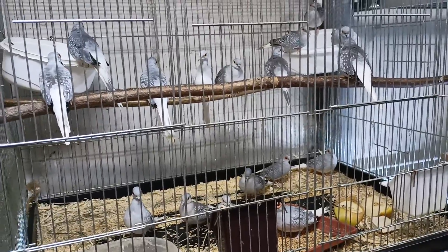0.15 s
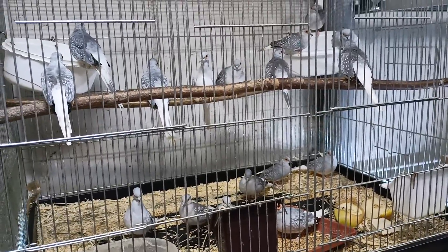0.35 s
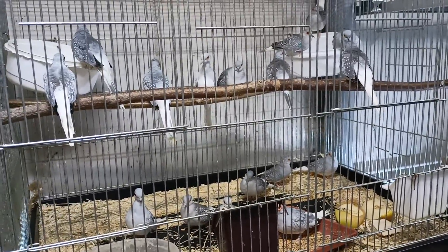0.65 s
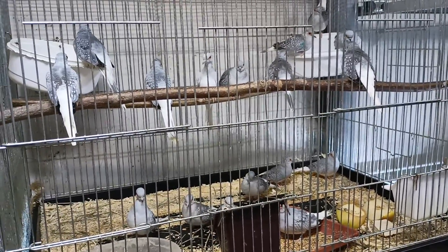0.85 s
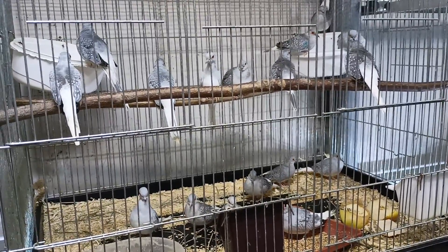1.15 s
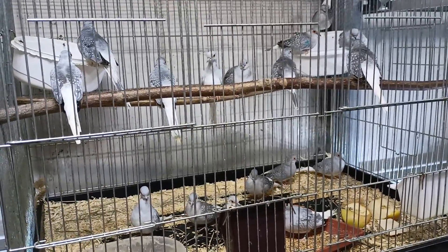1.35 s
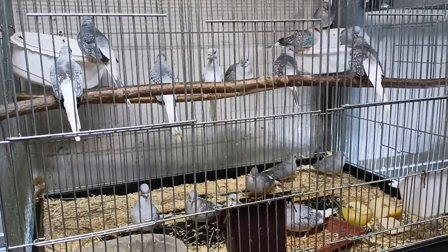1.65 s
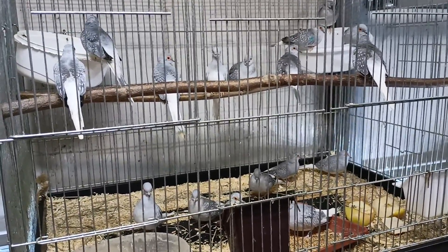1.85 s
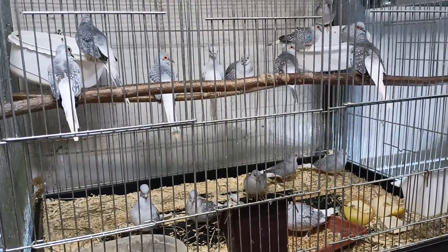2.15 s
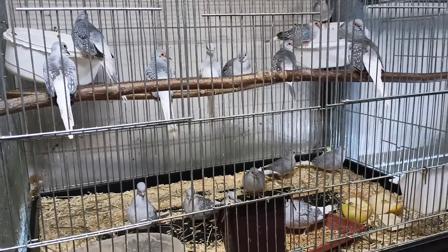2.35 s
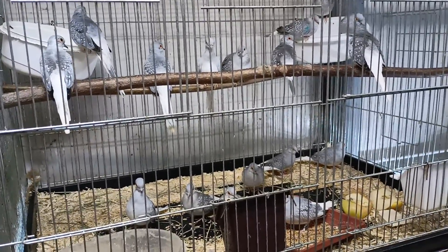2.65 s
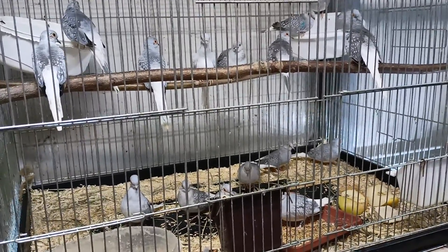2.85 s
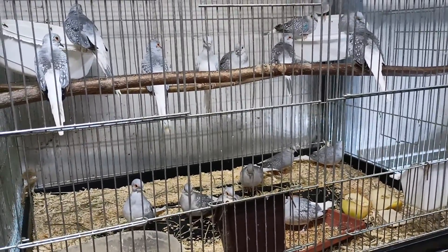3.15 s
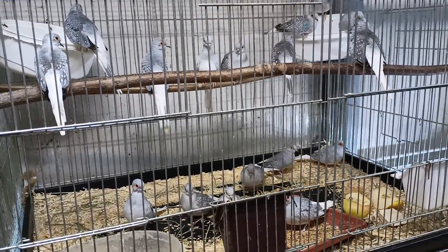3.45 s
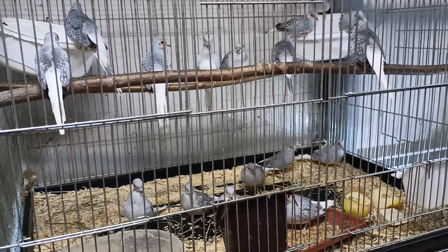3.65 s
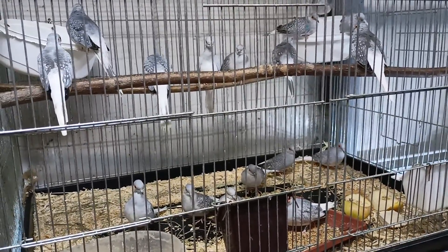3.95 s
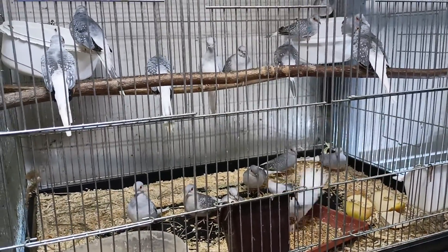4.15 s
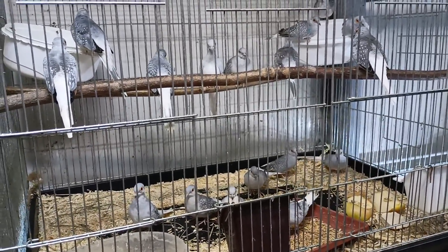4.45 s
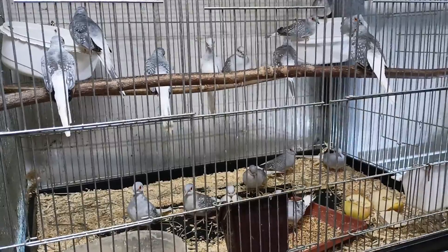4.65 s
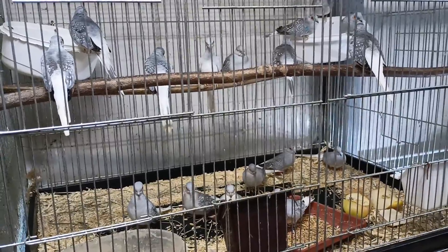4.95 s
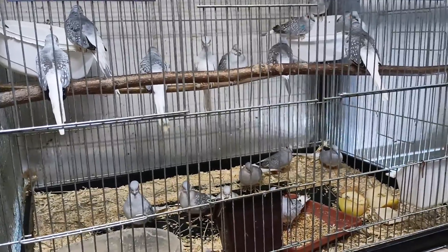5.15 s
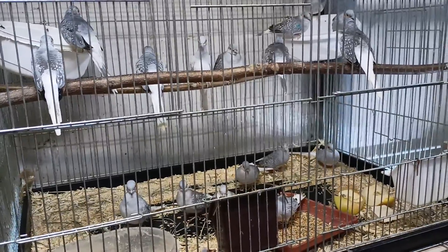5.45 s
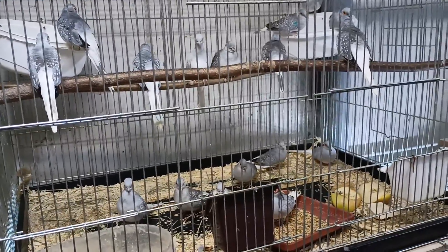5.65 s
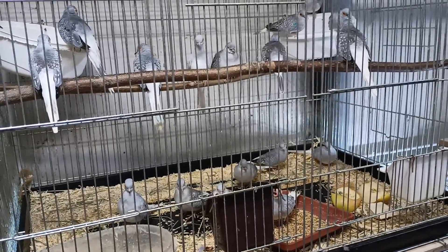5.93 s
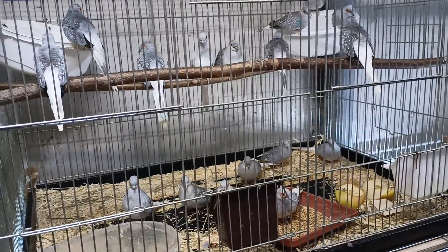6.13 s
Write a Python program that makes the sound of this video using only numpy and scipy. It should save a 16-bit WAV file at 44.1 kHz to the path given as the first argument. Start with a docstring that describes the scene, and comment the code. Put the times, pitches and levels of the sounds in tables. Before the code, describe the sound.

A reverberant hard-walled room holds small caged doves and finches over low room noise and a faint wavering hum. At 0 s comes a soft, bright swish of feathers with a thin falling squeak. From 0.4 to 0.95 s short nasal yaps repeat about every eighth of a second, trailing into fainter ones until 1.4 s, with a soft peep and a falling chip around 1.0-1.2. A distant rising whistle at 1.55 is followed by a loud, near one at 1.75. Feathers rustle and wing strokes snap crisply from 2.1 to 2.45, then tiny peeps patter to 3.2. A strong, airy, thumping wing flurry swells at 3.2-3.4 and again from 3.7. At 4.0 a loud scratchy cry rings out, dropping to a lower held note until 4.3. Sharp wing snaps hit near 4.45, then quiet. A final rising whistle sounds at 5.4, echoing into faint air and tiny chips until 6.3.

```python
"""A hard-walled room of small doves and finches in wire cages, with low room noise and a wavering hum.
First a swish of plumage, low air noise and a thin falling call, then nasal yaps of pulses through a throat
filter, soft peeps and sweeping chips, and two rising whistles of summed partials, the first from far off.
Noise shaped by wingbeats swells and fades with feather snaps, strongest after 3 s; a loud ringing cry
follows at 4 s, and a last whistle at 5.4 s. Echoes and a room tail surround calls and plumage."""
import sys
import numpy as np
from scipy import signal
from scipy.fft import rfft, irfft, next_fast_len
from scipy.io import wavfile
from scipy.ndimage import map_coordinates

SR = 44100
rng = np.random.default_rng(int(sys.argv[2]) if len(sys.argv) > 2 else 0)


def unload_wav(signal):
    """Save mono or channel-first audio to the path in sys.argv[1] as 16-bit WAV at rate SR, clipped to [-1, 1]."""
    wavfile.write(
        sys.argv[1],
        SR,
        np.round(np.clip(np.atleast_2d(signal).T, -1, 1) * 32767).astype(np.int16),
    )


N = 277277
TIME = np.arange(N) / SR
EDGE_HZ = 15950  # upper band limit


def amp(db):
    """Decibels to gain."""
    return 10 ** (np.asarray(db) / 20)


def unit(x):
    """Scales to rms 1."""
    return x / np.sqrt(np.mean(x ** 2) + 1e-20)


def read(points, hz):
    """Reads a spectrum on a log-frequency axis."""
    f, value = np.transpose(points)
    return np.interp(np.log(hz + 1), np.log(f), value)


def curves(rows):
    """Sample times and every column of a curve table."""
    s, *columns = np.transpose(rows)
    t = np.arange(s[0], s[-1], 1 / SR)
    return [t] + [np.interp(t, s, c) for c in columns]


def add(mix, s, sound):
    """Mixes a sound in at time s."""
    part = mix[max(round(s * SR), 0):][:len(sound)]
    part += sound[:len(part)]


def colour(x, spectrum):
    """Filters by a spectrum; rms 1."""
    size = next_fast_len(len(x) + 2048)
    gain = amp(read(spectrum, np.fft.rfftfreq(size, 1 / SR)))
    return unit(irfft(rfft(x, size) * gain, size)[:len(x)])


def wander(size, per_s):
    """Random motion in straight ramps between per_s random values a second."""
    knots = rng.standard_normal(2048)
    return map_coordinates(knots, [np.arange(size) * per_s / SR], order=1, mode="wrap")


def faded(x):
    """Softens both ends over up to 3 ms."""
    return x * signal.windows.tukey(len(x), min(1, 256 / len(x)))


def burst(rise_s, hold_s, fade_db_per_s, db, curve=1.14):
    """An envelope that swells, holds, then dies away."""
    t = TIME[:2 * SR]
    fade_db = fade_db_per_s * np.maximum(t - rise_s - hold_s, 0)
    return np.minimum(t / rise_s, 1) ** curve * amp(db - fade_db)


def bursts(rows):
    """The joint envelope of a table of bursts; their powers add."""
    power = np.zeros(N)
    for s, *shape in rows:
        add(power, s, burst(*shape) ** 2)
    return np.sqrt(power)


def syrinx(hz, rough, throat, jitter=.09, jitter_per_s=600, breath=1.0):
    """Pulses that grow uneven and noisy with roughness, through the throat."""
    rough = np.clip(rough, 0, .45)
    turns = np.cumsum(hz * (1 + jitter * rough * wander(len(hz), jitter_per_s))) / SR
    # the windpipe delays high harmonics more, which spreads each pulse over its cycle
    pulses = sum(np.cos(2 * np.pi * k * turns - np.pi * k * k / 14) * (k * hz < EDGE_HZ)
                 for k in range(1, 30))
    # turbulence is weak in the bass, so the lowest harmonics stay clear
    hiss = rng.standard_normal(len(hz)) * (1 + np.cos(2 * np.pi * turns))
    puffs = colour(hiss, [(700, -12), (2500, 0)])
    return colour((1 - rough) * unit(pulses) + breath * rough * puffs, throat)


def call(rows, throat):
    """A call that follows its pitch, level and roughness curves."""
    t, hz, db, rough = curves(rows)
    return t[0], faded(amp(db) * syrinx(hz, rough, throat))


# level of the room noise at the microphone: (time [s], level [dB])
BACKGROUND_LEVEL = [(0, -57.5), (2.9, -61), (5.55, -61), (5.9, -67), (6.29, -67.5)]
# its colour: (frequency [Hz], level [dB])
BACKGROUND_COLOUR = [(30, -28), (60, -9), (105, -4.5), (160, -8), (370, -13), (520, -16.5), (880, -19),
                     (1200, -25.5), (1800, -26), (3400, -37.5), (7700, -35.5), (10000, -42), (16000, -36)]
# ventilation tones: (frequency [Hz], level against the noise [dB])
VENTILATION_HUM = [(102, -5), (204, -3)]


def background():
    """Low room noise with a ventilation hum that wavers in phase and strength."""
    hum = np.zeros(N)
    for hz, db in VENTILATION_HUM:
        tone = np.sin(2 * np.pi * hz * TIME + wander(N, 22))
        hum += amp(db) * unit(tone * (1 + .4 * wander(N, 11)))
    level = amp(np.interp(TIME, *np.transpose(BACKGROUND_LEVEL)))
    return (colour(rng.standard_normal(N), BACKGROUND_COLOUR) + hum) * level


# sharp wing strokes: (time [s], level [dB], decay to 1/e [s])
WING_SNAPS = [(.912, -43.5, 0.0092), (2.135, -28.5, 0.0094), (2.18, -32.5, 0.0075), (2.267, -31, 0.0079),
              (2.31, -44, 0.016), (2.344, -34.5, 0.0105), (2.427, -33, 0.0082), (3.157, -48.5, 0.013),
              (4.436, -30.5, 0.0055), (4.481, -23.5, 0.0075), (4.94, -55, 0.019)]
# bright swishes of ruffled plumage: (time [s], level [dB])
SWISHES = [(0, -39), (3.234, -32)]
# colour of a swish: (frequency [Hz], level [dB])
SWISH_COLOUR = [(1000, -15), (2300, -13.5), (4000, -20), (5500, -15.5), (6700, -8), (8000, -3.5),
                (9500, -17), (12000, -15.5), (14000, -27), (16000, -16)]
# colour of feathers in snaps and rustles: (frequency [Hz], level [dB])
FEATHER_COLOUR = [(350, -16), (600, -4.5), (970, -9.5), (1830, -8.5), (2010, -8.5), (2210, -11),
                  (3340, -15.5), (5050, -12.5), (6460, -13), (7410, -7.5), (10700, -18.5), (15100, -13),
                  (16000, -10)]


def plumage():
    """Noise through the feathers: sharp wing-tip strokes and longer swishes of ruffled plumage."""
    out, t = np.zeros(N), TIME[:4096]
    for s, db, decay_s in WING_SNAPS:
        snap = colour(rng.standard_normal(len(t)), FEATHER_COLOUR)
        add(out, s, amp(db) * snap * np.exp(-t / decay_s))
    for s, db in SWISHES:
        swell = burst(rise_s=0.0215, hold_s=0.016, fade_db_per_s=138.5, db=db)
        add(out, s, swell * colour(rng.standard_normal(len(swell)), SWISH_COLOUR))
    return out


# swells of low air noise, the strongest from flapping wings:
# (time [s], rise [s], hold [s], fade [dB/s], level [dB])
AIR_SWELLS = [(0, 0.013, .15, 78, -49.5), (.42, .13, .3, 26.5, -58), (1.13, 0.049, .12, 94, -55),
              (1.85, 0.065, .02, 67, -41.5), (1.95, .2, .27, 110, -39), (3.23, 0.14, .06, 34, -29),
              (3.77, 0.17, .06, 23.5, -37), (4.35, 0.057, .02, 59, -35), (4.62, 0.097, .13, 158, -48),
              (5.0, 0.15, 0.22, 32, -70.5), (5.62, 0.057, .04, 125.5, -56)]
# colour of the air noise: (frequency [Hz], level [dB])
AIR_COLOUR = [(21, -50), (35, -21.5), (85, 1), (141, -6.5), (191, 0.5), (309, -7), (351, -1), (458, -11.5),
              (588, -10), (970, -21.5), (2250, -30), (2500, -26), (3250, -50.5), (5500, -120)]
# feathers rubbing as the wings work: (time [s], rise [s], hold [s], fade [dB/s], level [dB])
FEATHER_RUSTLES = [(1.52, .35, 0.535, 174, -43), (3.0, 0.036, 0.062, 120, -61.5),
                   (3.153, 0.021, 0.064, 115, -49), (3.22, 0.12, 0.068, 63.5, -37),
                   (3.72, 0.36, .04, 38.5, -39), (4.38, 0.066, 0.053, 64, -41.5),
                   (4.7, .1, 0.07, 110, -62.5)]
WINGBEATS_PER_S = 23  # average rate


def wings(air_throb=0.12, feather_throb=0.14, grain_db=2, thump_db=-3.0, thump_growth=0.254):
    """Air noise and feather rustle throb at the wingbeat rate; strong swells add a deep thump."""
    beat = np.cos(2 * np.pi * np.cumsum(WINGBEATS_PER_S * (1 + .12 * wander(N, 8.9))) / SR)
    air = colour(rng.standard_normal(N), AIR_COLOUR) * unit(1 + air_throb * beat)
    deep = signal.sosfiltfilt(signal.butter(2, 115, fs=SR, output="sos"), air)
    grains = rng.standard_normal(N) * amp(grain_db * wander(N, 900))
    rustle = colour(grains, FEATHER_COLOUR) * unit(1 + feather_throb * beat)
    swell = bursts(AIR_SWELLS)
    # above a swell of -42 dB the bass grows faster than the rest of the air
    thump = amp(thump_db) * np.maximum(swell / amp(-42), 1) ** thump_growth * deep
    return swell * (air - deep + thump) + bursts(FEATHER_RUSTLES) * rustle


# a thin falling call: (time [s], pitch [Hz], level [dB], roughness [0-1])
SQUEAK = [(0, 1340, -35.5, 0.15), (.04, 1275, -44.5, 0.05), (.11, 1180, -42, 0.07)]
# its throat: (frequency [Hz], level [dB])
SQUEAK_THROAT = [(700, -4), (1250, -3.5), (2500, -4.5), (4000, -15), (12000, -14)]


def squeak():
    """Nearly clean pulses sinking in pitch through a broad throat, fullest below 2.5 kHz."""
    return call(SQUEAK, SQUEAK_THROAT)


# nasal yaps: (time [s], length [s], top pitch [Hz], end pitch [Hz], level before the swell [dB],
# roughness [0-1], beak ring [dB], treble [dB], gape [factor on the upper throat])
YAPS = [(.422, 0.053, 858.6, 668, -37.5, 0.46, 8.5, 1.5, 1.12),
        (0.546, 0.047, 833, 582, -24.5, 0.52, 18, 1.5, 1.02),
        (0.671, 0.038, 818, 594, -26.5, 0.36, 12, 5, 1.07),
        (0.805, 0.04, 790, 581.4, -23.5, 0.18, 19.5, 1.5, 0.96),
        (0.91, 0.042, 724.7, 703, -41.5, 0.7, 14, -20, 1.1),
        (1.1, 0.074, 688, 600, -44, 0.3, -5.5, 3.5, 1.2),
        (1.232, 0.031, 559.6, 520, -42.5, 0.42, -17.5, 1, 1.12),
        (1.36, 0.067, 690, 557, -49.5, 0.29, -3, 4, 1.14)]
# throat of a yap: (frequency [Hz], level [dB])
YAP_THROAT = [(400, -3.5), (750, 0.5), (1100, -1), (1600, -1), (2400, -2), (3500, -8.5), (4300, -9),
              (5300, -14.5), (7000, -9.5), (8100, -19), (9300, -19), (10400, -40), (12300, -32),
              (14200, -17.5), (15600, -26)]


def yap(s, length, top_hz, end_hz, db, rough, ring_db, treble_db, gape,
        start_share=.72, rise_s=0.019, beak_hz=3120, beak_width_hz=450):
    """A short pitch arch; the open beak rings at one frequency, a wider gape lifts upper resonances."""
    t = np.arange(0, length, 1 / SR)
    crest = min(rise_s, .7 * length)
    pitch = np.interp(t, [0, crest / 2, crest, length],
                      [start_share * top_hz, 0.87 * top_hz, top_hz, end_hz])
    f = np.geomspace(300, 16000, 160)
    upper = np.tanh((f - 4400) / 900)  # -1 in the bass, 1 in the treble
    shape = read(YAP_THROAT, f / gape ** ((1 + upper) / 2)) + treble_db * upper
    shape += ring_db * np.exp(-.5 * ((f - beak_hz) / beak_width_hz) ** 2)
    swell_db = np.interp(t, [0, crest, .75 * length, length], [-13, 5.5, -4.5, 5.5])
    return s, faded(amp(db + swell_db) * syrinx(pitch, rough, np.column_stack([f, shape])))


# soft contact peeps: (time [s], length [s], middle pitch [Hz], glide [end/start pitch], level [dB])
PEEPS = [(1.039, 0.02, 1332, 1.45, -38), (2.269, 0.017, 1106, 1.08, -41), (2.5, 0.017, 1238, 1.3, -37),
         (2.739, .022, 1065, 1.08, -56), (2.767, 0.022, 855, 0.86, -48), (2.859, .022, 1113, 1.17, -48),
         (2.921, 0.0243, 886, 1.5, -45.5), (2.97, 0.023, 1020, 1.08, -53),
         (3.045, 0.027, 1077, 0.86, -52.5), (3.165, 0.03, 933, 1.32, -42)]
# throat of a peep: (multiple of the pitch, level [dB])
PEEP_OVERTONES = [(1, -12.5), (2, 7), (3, -11), (4, -12.5), (8, -25.5)]


def peep(s, length, hz, glide, db, rough=0.25, fade_db=5):
    """A tiny gliding note whose second harmonic carries the sound."""
    rows = [(s, hz / glide ** .5, db, rough),
            (s + length / 2, hz, db, rough),
            (s + length, hz * glide ** .5, db - fade_db, rough)]
    return call(rows, [(k * hz, level) for k, level in PEEP_OVERTONES])


# quick chips: (time [s], length [s], start pitch [Hz], end pitch [Hz], level [dB], overtone [dB])
CHIPS = [(1.202, 0.023, 4170, 1890, -35.5, -7.5), (2.76, 0.0094, 2210, 4100, -51.5, -8),
         (2.91, 0.016, 1970, 3770, -52.5, -10), (3.153, .012, 1470, 3600, -47, -11),
         (5.86, .014, 2515, 4110, -60.5, -20.5), (6.013, 0.029, 4240, 2232, -53.5, -7),
         (6.137, .012, 8600, 6500, -65.5, -33.5)]


def chip(s, length, start_hz, end_hz, db, overtone_db):
    """A quick sweep with one overtone, an octave up."""
    hz = np.geomspace(start_hz, end_hz, int(length * SR))
    phase = 2 * np.pi * np.cumsum(hz) / SR
    return s, faded(amp(db) * unit(np.sin(phase) + amp(overtone_db) * np.sin(2 * phase)))


# rising whistles, first one far off: (time [s], length [s], start pitch [Hz], top pitch [Hz],
# mid-note level [dB], half-pitch rasp [0-1], octave [dB], upper overtones [dB])
WHISTLES = [(1.563, .13, 1786, 2400, -36, 0.6, 3.5, 7.5), (1.746, 0.12, 1647, 2260, -16.5, 0.55, -5.5, 1.5),
            (5.391, .152, 1589, 2265, -23, 0.17, 3, 0)]
# a whistle lingers low, then slides up: (share of its length, share of the climb)
WHISTLE_SLIDE = [(0, 0), (.14, .1), (.31, .2), (.51, .58), (.85, .98), (1, 0.94)]
# throat of a whistle: (frequency [Hz], level [dB])
WHISTLE_THROAT = [(900, -22), (1600, -1), (2350, 2), (2800, -14), (3400, -18), (4300, -21.5), (5200, -26),
                  (6700, -25), (7900, -27), (8900, -41), (10200, -39.5), (12500, -56.5), (15500, -25)]
WHISTLE_ATTACK_S, WHISTLE_RELEASE_S, RASP_FADE_S = 0.015, 0.0221, 0.032
WHISTLE_SWELL_DB = 7.5  # louder in the middle than at the ends


def whistle(s, length, start_hz, top_hz, db, rasp, octave_db, upper_db,
            waver=.014, waver_per_s=400, overtone_waver=0.27):
    """A rising tone with fuzzy overtones; at its start the membranes also beat at half pitch."""
    t = np.arange(0, length, 1 / SR)
    climb = np.interp(t / length, *np.transpose(WHISTLE_SLIDE))
    hz = start_hz + (top_hz - start_hz) * climb
    phase = 2 * np.pi * np.cumsum(hz * (1 + waver * wander(len(t), waver_per_s))) / SR
    blur = overtone_waver * wander(len(t), 1200)
    partials = [np.sin(k * phase + (k - 1) * blur) * (k * hz < EDGE_HZ) for k in range(1, 10)]
    tone = partials[0] + amp(octave_db) * partials[1] + amp(upper_db) * sum(partials[2:])
    halves = np.sin(3 * phase / 2) + np.sin(phase / 2)
    halves *= wander(len(t), 600) * rasp * np.exp(-t / RASP_FADE_S)
    gate = np.minimum(t / WHISTLE_ATTACK_S, 1) * np.minimum((length - t) / WHISTLE_RELEASE_S, 1)
    effort_db = db - WHISTLE_SWELL_DB * (1 - np.sin(np.pi * t / length))
    return s, amp(effort_db) * gate * colour(tone + halves, WHISTLE_THROAT)


# scratchy start, ringing peak and lower held note of the loud cry:
# (time [s], pitch [Hz], level [dB], roughness [0-1])
CRY_START = [(4.004, 528.3, -39.5, 0), (4.018, 706.4, -19.5, 0.22), (4.033, 847, -13.5, 0.4),
             (4.058, 879, -22, 0.28)]
CRY_PEAK = [(4.045, 929, -23.5, 0.25), (4.066, 971, -9.5, 0.29), (4.085, 990, -12.5, 0.3),
            (4.104, 980.5, -10, 0.17), (4.124, 953.4, -11, 0.23)]
CRY_HOLD = [(4.108, 812, -20.5, .3), (4.14, 795.9, -22, .2), (4.2, 784.5, -28.5, .18),
            (4.245, 792.7, -24.5, .16), (4.275, 781, -23, 0.24)]
# throat in each part: (frequency [Hz], level [dB])
START_THROAT = [(400, -24), (850, -0.5), (1700, -4.5), (2500, -5.5), (3400, 4), (5200, -2), (6500, -4),
                (7800, -2), (10500, -19.5), (15500, -24.5)]
PEAK_THROAT = [(950, -28), (1950, -44.5), (2900, -17.5), (3900, 1.5), (4900, -2.5), (5850, -12),
               (6800, -15.5), (7800, 1), (8700, -18.5), (9700, -18), (10700, -37.5), (11700, -18),
               (13500, -33.5), (15500, -17)]
HOLD_THROAT = [(780, -13), (1570, -6.5), (2350, -12), (3150, -10), (3900, 1), (4750, -2), (6200, -24.5),
               (7700, -15.5), (8700, -25.5), (9700, -19), (10800, -36.5), (15500, -35.5)]


def loud_cry():
    """Three overlapping stretches of voice, each through its own throat shape."""
    out = np.zeros(N)
    for rows, throat in [(CRY_START, START_THROAT), (CRY_PEAK, PEAK_THROAT), (CRY_HOLD, HOLD_THROAT)]:
        add(out, *call(rows, throat))
    return out


# how long the hard-walled room rings: (frequency [Hz], time to fall 60 dB [s])
ROOM_T60 = [(200, .7), (800, .6), (2000, .46), (4000, .5), (8000, .47), (15000, .3)]


def room(x, direct_db, early_db, tail_db, early_t60=0.18):
    """Direct sound, dense echoes from the cage walls, and the room's tail."""
    size = 36000
    t = TIME[:size]
    hits = rng.random(size) < 1500 / SR  # about 1500 echoes a second
    early = rng.standard_normal(size) * hits * amp(-60 * t / early_t60) * (t > .002)
    hz, frames, z = signal.stft(rng.standard_normal(size), SR, nperseg=256)
    decay = amp(-60 * frames / read(ROOM_T60, hz)[:, None])
    tail = signal.istft(z * decay, SR, nperseg=256)[1][:size]
    tail *= 1 - np.exp(-t / 0.018)  # the tail builds up gradually
    response = amp(early_db) * early / np.linalg.norm(early) + amp(tail_db) * tail / np.linalg.norm(tail)
    response[0] += amp(direct_db)
    return signal.fftconvolve(x, response)[:N]


def scene():
    """Each group of calls has its own balance of direct sound, echoes and tail at the microphone."""
    yaps, far, near, small_calls = np.zeros((4, N))
    add(small_calls, *squeak())
    for row in YAPS:
        add(yaps, *yap(*row))
    for row in PEEPS:
        add(small_calls, *peep(*row))
    for row in CHIPS:
        add(small_calls, *chip(*row))
    for bird, row in zip([far, near, near], WHISTLES):
        add(bird, *whistle(*row))
    birds = room(small_calls, direct_db=-10, early_db=-6, tail_db=-17)
    birds += room(yaps, direct_db=-7, early_db=-1.0, tail_db=-10.5)
    birds += room(far, direct_db=-8.5, early_db=-8.5, tail_db=-5.5)
    birds += room(near, direct_db=-11.5, early_db=-3.5, tail_db=-6.0)
    birds += room(loud_cry(), direct_db=-4, early_db=-3.5, tail_db=-7.0)
    feathers = room(plumage(), direct_db=-4.5, early_db=-1.5, tail_db=-3.5)
    return (background() + feathers + wings() + birds)[None]


def record(dry):
    """The recorder's ceiling and band limit."""
    held = np.clip(dry, -.85, .85)
    lowpass = signal.firwin(511, EDGE_HZ, window=("kaiser", 9), fs=SR)
    return signal.oaconvolve(held, lowpass[None], "same")


dry = scene()
out = record(dry)
unload_wav(out)
```